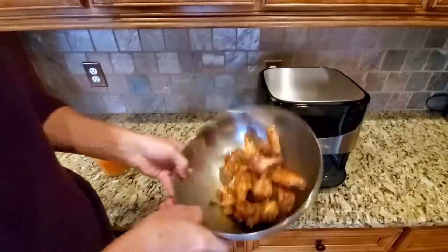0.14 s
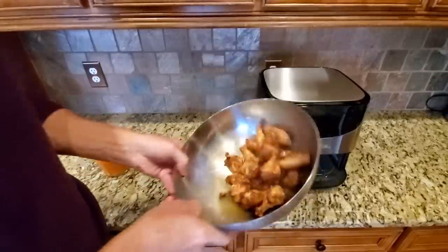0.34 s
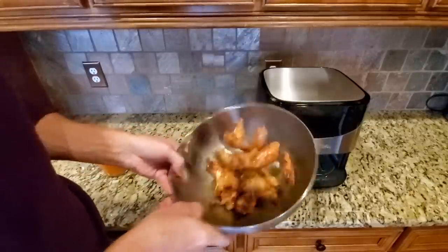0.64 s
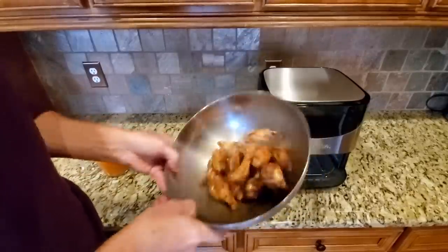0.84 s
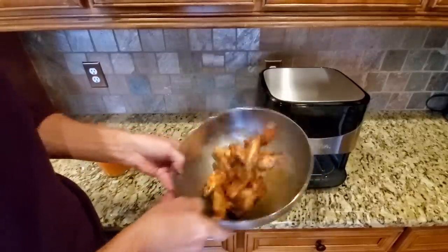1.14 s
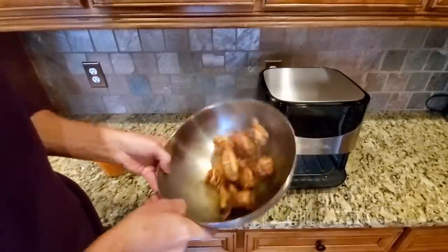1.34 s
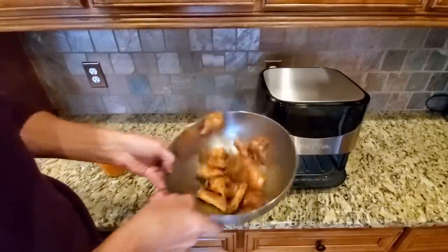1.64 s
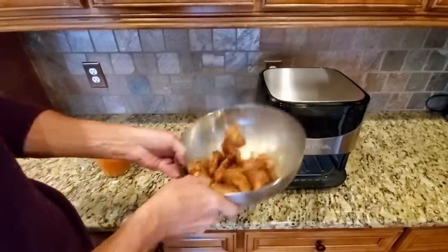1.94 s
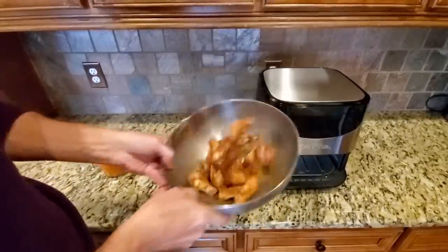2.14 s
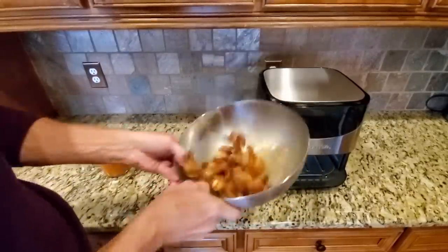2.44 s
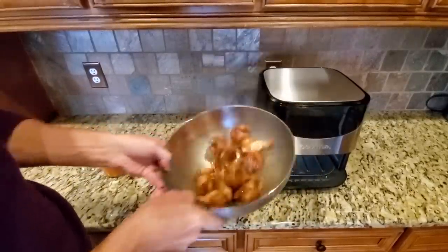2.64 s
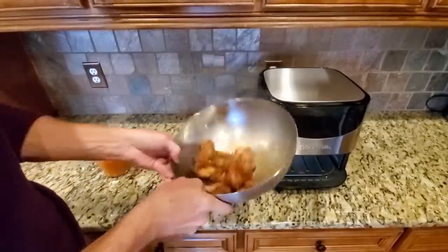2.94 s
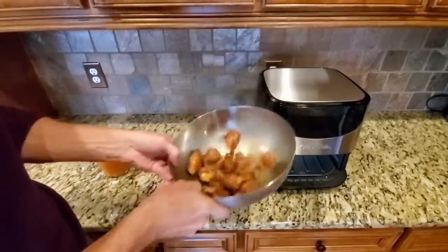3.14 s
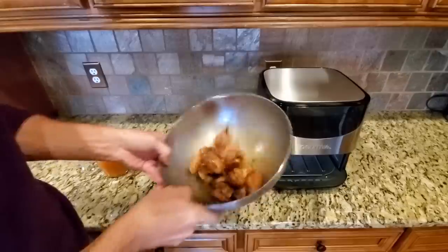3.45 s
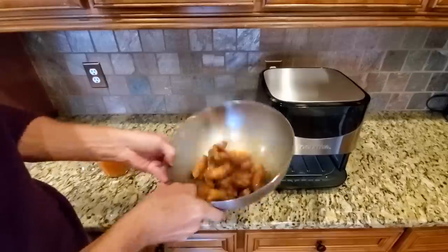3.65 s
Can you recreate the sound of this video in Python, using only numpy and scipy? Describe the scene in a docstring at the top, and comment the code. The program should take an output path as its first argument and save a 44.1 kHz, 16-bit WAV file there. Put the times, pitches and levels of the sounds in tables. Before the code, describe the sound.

Chicken wings are tossed in a steel bowl about four times a second, landing with soft thuds, light clanks and crisp clicks. A few tiny squeaks and one louder clank come through, heard close in a kitchen.

```python
"""Tossing chicken wings in a steel bowl

Coated wings land in a hand-held bowl, about four tosses a second. Each impact excites the damped modes
of the steel, a thud from the bottom and a clank from the wall, while the brittle crust clicks and cracks.
Smaller pieces tumble around them, and now and then a skidding wing squeaks by stick-slip friction.
The tiled kitchen reverberates, and an appliance hums faintly."""
import sys
import numpy as np
from scipy import signal
from scipy.fft import rfft, irfft, next_fast_len
from scipy.io import wavfile

SR = 44100
rng = np.random.default_rng(int(sys.argv[2]) if len(sys.argv) > 2 else 0)


def transcribe(u):
    """Save the signal u as a 16-bit wav file named by the first command-line argument.

    u: samples, shape (n,) or (channels, n), limited to [-1, 1]; the rate is SR.
    q: integer samples, one column per channel.
    """
    v = np.clip(np.atleast_2d(u).T, -1, 1)
    q = np.round(v * 32767).astype(np.int16)
    wavfile.write(sys.argv[1], SR, q)


N = 167580
LEFT_RIGHT = np.array([[.5], [-.5]])  # splits a difference between the ears


def amp(db):
    """Decibels to amplitude ratio."""
    return 10 ** (np.asarray(db) / 20)


def unit(x):
    """Normalisation to rms 1."""
    return x / np.sqrt(np.mean(x ** 2) + 1e-20)


def at_level(x, db, onset_s=.008):
    """Normalisation of an impact by the rms level of its onset."""
    onset = x[..., :round(onset_s * SR)]
    return x * amp(db) / np.sqrt(np.mean(onset ** 2) + 1e-20)


def along(points, hz):
    """Interpolation on a logarithmic frequency axis."""
    freqs, values = np.transpose(points)
    return np.interp(np.log(hz + 1), np.log(freqs + 1), values)


def filtered(x, response):
    """Filtering as multiplication of the spectrum by a frequency response."""
    n = x.shape[-1]
    padded = next_fast_len(n + 4096)
    return irfft(rfft(x, padded) * response(np.fft.rfftfreq(padded, 1 / SR)), padded)[..., :n]


def coloured(x, spectrum):
    """Minimum-phase filtering: the response is causal, so attacks stay sharp."""
    def response(hz):
        cepstrum = np.fft.irfft(np.log(amp(along(spectrum, hz))))
        half = len(cepstrum) // 2
        return np.exp(rfft(np.r_[cepstrum[0], 2 * cepstrum[1:half]], len(cepstrum)))
    return filtered(x, response)


def add(out, start_s, x):
    """Superposition of x on out from a given time."""
    i = max(0, round(start_s * SR))
    n = max(0, min(x.shape[-1], N - i))
    out[:, i:i + n] += x[..., :n]


# Likeness of the two ears' signals. Each row: frequency in Hz, correlation (capped at 1 in use).
COHERENCE = [(100, 1.13), (330, 0.9), (520, 0.8), (900, 0.2), (3000, 0.35)]

def diffuse(pair):
    """Interaural coherence: two independent signals mix into a field that is nearly mono in the bass."""
    def weights(hz):
        angle = np.arccos(np.clip(along(COHERENCE, hz), -1, 1)) / 2
        return np.array([np.cos(angle), np.sin(angle)])
    mid, side = filtered(pair, weights)
    return np.array([mid + side, mid - side])


# Spectrum of the room air. Each row: frequency in Hz, relative density in dB.
AIR_SPECTRUM = [(25, -14), (55, -3), (130, -8), (500, -8), (1000, -18), (3500, -27.5), (6000, -25.5),
                (16000, -36)]
# Harmonics of the hum. Each row: frequency in Hz, level in dB.
HUM_PARTIALS = [(119.6, -52), (239.2, -58)]

def background(air_db=-47.5):
    """Steady ambient noise: broadband room air plus the mains harmonics of an appliance."""
    t = np.arange(N) / SR
    air = unit(coloured(diffuse(rng.standard_normal((2, N))), AIR_SPECTRUM))
    hum = sum(np.sqrt(2) * amp(db) * np.sin(2 * np.pi * (hz * t + rng.random()))
              for hz, db in HUM_PARTIALS)
    return amp(air_db) * air + hum


# Reverberation time. Each row: frequency in Hz, time to fall 60 dB (T60) in seconds.
TAIL_T60 = [(150, 0.09), (1500, 0.46), (6000, 0.31), (14000, 0.13)]
# Strength of the reverberation. Each row: frequency in Hz, relative level in dB.
TAIL_LEVELS = [(100, -8.5), (600, -3.5), (6000, -6.5), (14000, -1)]

def kitchen(x, delay_s=.002, early_db=-3, early_t60_s=0.053):
    """Convolution with a room response: direct sound, early reflections off bowl and counter, a tail."""
    hz, t, noise = signal.stft(rng.standard_normal((2, SR // 2)), SR, nperseg=256)
    def decay(t60):
        fade = amp(-60 * t / t60) * (t > delay_s)
        return fade / np.sqrt(np.mean(fade ** 2, -1, keepdims=True) * SR / 2)
    tail = decay(along(TAIL_T60, hz)[:, None]) * amp(along(TAIL_LEVELS, hz))[:, None]
    early = decay(early_t60_s) * amp(early_db)
    response = diffuse(signal.istft(noise * np.hypot(tail, early), SR, nperseg=256)[1])
    response[:, 0] += 1  # direct sound
    return signal.fftconvolve(x, response, axes=1)


def contacts(per_second, scatter_db=4.5):
    """A Poisson process of tiny impacts of uneven size."""
    hits = rng.random((2, N)) < per_second / SR
    signs = rng.choice([-1, 1], (2, N))
    return hits * signs * amp(scatter_db * np.clip(rng.standard_normal((2, N)), -2, 2))


# Spectra of soft bumps and of rustling crust. Each row: frequency in Hz, relative density in dB.
BUMP_SPECTRUM = [(40, -8.5), (100, 0), (380, -5), (480, 0.5), (700, -5), (1060, -13), (1400, -5.5),
                 (2000, -5), (3000, -11.5), (5000, -27)]
RUSTLE_SPECTRUM = [(1000, -8.5), (3000, -17), (4400, -6.5), (5850, 2.5), (7000, 1), (8500, -14.5),
                   (16000, -18)]
# The heap tumbling. Each row: time of the peak in seconds, relative bump and rustle levels in dB.
TOSS_PEAKS = [(0.082, -32.5, -35.5), (0.314, -30, -35), (0.564, -28.5, -37.5), (0.806, -28, -31.5),
              (1.053, -33.5, -33), (1.298, -32, -34.5), (1.534, -31, -39), (1.781, -31.5, -34.5),
              (2.023, -30.5, -31), (2.298, -30, -33), (2.523, -32, -36.5), (2.777, -28.5, -33.5),
              (3.006, -32.5, -31), (3.238, -27, -33), (3.486, -26.5, -30.5), (3.703, -33.5, -30)]

def tumbling(rise_s=0.036, fall_s=0.031, bump_gain_db=-3, rustle_gain_db=-1.5):
    """Shot noise: many small collisions merge into bumps and rustle that swell and die with each toss."""
    peak_s, bump_db, rustle_db = np.transpose(TOSS_PEAKS)[:, :, None]
    t = np.arange(N) / SR - peak_s
    swell = np.exp(np.where(t < 0, -(t / rise_s) ** 2, -t / fall_s))
    bumps = unit(coloured(diffuse(contacts(per_second=200)), BUMP_SPECTRUM))
    bumps *= (swell * amp(bump_db + bump_gain_db)).sum(0)
    rustle = unit(coloured(contacts(per_second=260), RUSTLE_SPECTRUM))
    rustle *= (swell * amp(rustle_db + rustle_gain_db)).sum(0)
    return kitchen(bumps + rustle)[:, :N]


def attack(t, contact_s=.00028):
    """A finite contact time rounds off the onset of an impact."""
    return 1 - np.exp(-t / contact_s)


def ring(modes, t, detune, scatter_db=1.5):
    """Modal superposition: damped sines, all pushed inward at once, vary with the place of contact."""
    hz, db, t60 = np.transpose(modes)[:, :, None]
    level_draw, pitch_draw = rng.standard_normal((2, len(hz), 1))
    envelopes = amp(db + scatter_db * level_draw - 60 * t / t60)
    waves = envelopes * np.sin(2 * np.pi * hz * (1 + detune * pitch_draw) * t)
    return -waves.sum(0) * attack(t)


# Modes of the free rim. Each row: frequency in Hz, relative level in dB, T60 in seconds.
RIM_MODES = [(475, -26, 0.5), (1058, -25, 0.68), (1140, -29, 0.6), (1533, -30, 0.48), (2030, -26, 0.5)]
BONE_DB = -13  # clank level from which a blow counts as bare bone

def rim(t, clank_db, growth=1.3):
    """Free vibration: the lightly damped rim rings on, more than in proportion after a hard clank."""
    return amp(BONE_DB + growth * (clank_db - BONE_DB)) * ring(RIM_MODES, t, detune=0.00586)


# Skids on the steel. Each row: start in seconds, length in seconds, pitch in Hz, relative level in dB.
SKIDS = [(0.485, 0.018, 1860, -38), (0.832, 0.019, 2000, -24), (0.981, 0.015, 1830, -37),
         (2.701, 0.085, 1840, -38), (2.957, 0.084, 1036, -19), (3.04, 0.06, 590, -33)]

def squeaks(rise=0.035, waver=0.003, roughness=.22, overtone_db=-30, catch_hz=25, sympathy_db=-21):
    """Stick-slip friction gives a rough, rising tone; rim modes near its pitch resonate in sympathy."""
    direct, ringing = np.zeros((2, 2, N))
    t = np.arange(SR // 2) / SR
    for start_s, length_s, hz, db in SKIDS:
        progress = np.linspace(0, 1, round(length_s * SR))
        def wander(count):
            return np.interp(progress, np.linspace(0, 1, count), rng.standard_normal(count))
        slips = round(length_s * hz / 3)  # the grip changes every three cycles
        pitch_hz = hz * (1 + rise * progress + waver * wander(10))
        jitter = roughness * (hz / 1050) ** 2 * wander(slips)  # high squeaks grip less evenly
        phase = 2 * np.pi * np.cumsum(pitch_hz) / SR + jitter
        tone = np.sin(phase) + amp(overtone_db) * np.sin(2 * phase)
        envelope = np.interp(progress, [0, .08, .25, .5, 1], [0, 1, 1, .45, 0])
        grip = 1 + roughness / 2 * wander(slips)
        add(direct, start_s, amp(db) * envelope * grip * tone)
        for rim_hz, _, t60 in RIM_MODES:
            if abs(rim_hz - hz) < catch_hz:
                decay = amp(db + sympathy_db - 60 * t / t60)
                add(ringing, start_s + length_s / 2, decay * np.sin(2 * np.pi * rim_hz * t))
    return (direct + kitchen(direct)[:, :N]) / 2 + ringing


# Spectrum of breaking crust. Each row: frequency in Hz, relative density in dB.
CRUNCH_SPECTRUM = [(1500, -5), (2800, 2), (4200, 0), (9000, 1), (12500, 4.5), (16000, -1.5)]

def crunch(t, cracks_per_s=2000, scatter_db=4.5, t60_s=0.02):
    """Brittle fracture: the coating breaks in a quick cluster of uneven cracks."""
    count = len(t) * cracks_per_s // SR
    sizes = np.interp(t, np.linspace(0, t[-1], count), np.clip(rng.standard_normal(count), -2, 2))
    envelope = amp(scatter_db * sizes - 60 * t / t60_s) * attack(t)
    return coloured(rng.standard_normal((2, len(t))) * envelope, CRUNCH_SPECTRUM)


# High resonances of the scratched steel. Each row: frequency in Hz, relative density in dB.
SCRATCH_SPECTRUM = [(1500, -22), (4400, -15.5), (5300, -10.5), (5850, 1), (7100, 3.5), (8300, -8.5),
                    (11000, -36.5)]

def click(t, hz, ping_s=.00028, ear_phase_rad=2.17, scratch_db=-5, scratch_t60_s=0.015):
    """A hard point contact excites high frequencies: a tip of crust pings the steel, then scratches it."""
    age = t / ping_s
    ear_phases = ear_phase_rad * (1 + rng.standard_normal() / 2) * LEFT_RIGHT
    ping = age ** 2 * np.exp(-age) * np.sin(2 * np.pi * hz * t + ear_phases)
    envelope = amp(-60 * t / scratch_t60_s) * attack(t, contact_s=0.0013)
    scratch = coloured(rng.standard_normal((2, len(t))) * envelope, SCRATCH_SPECTRUM)
    return at_level(ping, 0) + at_level(scratch, scratch_db)


# Modes of the loaded bottom. Each row: frequency in Hz, relative level in dB, T60 in seconds.
BOTTOM_MODES = [(127, -21, 0.035), (257, -31, 0.12), (386, -9, 0.018), (472, 4, 0.036), (590, -9, 0.025)]

def thud(t, dent_db=6, half_width_s=0.00046):
    """Forced, then free motion: the bottom gives once under a soft wing and rings briefly."""
    u = t / half_width_s - np.e
    dent = amp(dent_db) * u * np.exp((1 - u ** 2) / 2) * attack(t)
    return dent + ring(BOTTOM_MODES, t, detune=.06)  # the shifting load bends the pitch


# Modes of the wall. Each row: frequency in Hz, relative level in dB, T60 under flesh in seconds.
WALL_MODES = [(929, -6, 0.012), (1050, 3.5, 0.022), (1140, 0, 0.016), (1545, -4.5, 0.015),
              (2035, -1.5, 0.019), (2700, -2, 0.003)]

def clank(t, db, bone_range_db=14, tilt_db_per_octave=2.5, bone_sustain=1.7):
    """Contact damping: flesh shortens, detunes and tilts the wall's modes; bone rebounds and they ring."""
    flesh = np.clip((BONE_DB - db) / bone_range_db, 0, 1)
    lowest_hz = WALL_MODES[0][0]
    sustain = bone_sustain ** (1 - flesh)
    modes = [(hz, level + flesh * tilt_db_per_octave * np.log2(hz / lowest_hz), t60 * sustain)
             for hz, level, t60 in WALL_MODES]
    return ring(modes, t, detune=0.027 * flesh)


# The wall turning to the left. Each row: time in seconds, the clank's left minus right level in dB.
WALL_PAN = [(3.03, -0.5), (3.24, 2.5)]
# Wings landing. Each row: start in seconds, relative levels of thud, clank, click and crunch in dB,
# pitch of the click in Hz.
LANDINGS = [(0.0221, -31, -40.5, -31, -46, 6000), (0.0773, -27.5, -39, -22.5, -30.5, 5970),
            (0.0897, -32.5, -30.5, -29, -55, 6050), (0.252, -31.5, -39.5, -48, -53, 7000),
            (0.279, -26.5, -31, -28, -32, 5670), (0.284, -27, -27, -31, -53, 5730),
            (0.309, -26.5, -30, -40, -50, 6700), (0.3537, -20.5, -34, -31, -43, 5940),
            (0.3633, -23.5, -36, -30, -43, 5500), (0.3983, -28.5, -33, -27.5, -41, 6860),
            (0.5376, -27, -27, -37, -47, 5750), (0.547, -42, -59, -29, -33, 6640),
            (0.5795, -33.5, -35.5, -38, -50, 6170), (0.644, -31, -39, -34, -49, 6220),
            (0.6859, -32.5, -36.5, -28.5, -35.5, 6030), (0.7844, -27, -26, -19.5, -27.5, 6170),
            (0.8191, -20.5, -38, -22.5, -37, 5740), (0.8348, -36, -27, -32, -45, 6050),
            (0.892, -31, -35, -32, -47.5, 5900), (1.0297, -30.5, -32.5, -31, -42, 5940),
            (1.0438, -25.5, -29, -33, -36, 5840), (1.0603, -26, -43, -25, -29.5, 6040),
            (1.143, -29, -31, -29, -40, 6400), (1.2604, -31.5, -37, -22.5, -34.5, 6320),
            (1.2802, -36, -32, -30.5, -34, 6900), (1.347, -32.5, -42, -42, -48, 5640),
            (1.3954, -28.5, -31, -27, -36, 5730), (1.497, -29, -31, -36.5, -35, 5860),
            (1.5157, -63, -50, -28, -50, 5750), (1.5326, -29.5, -39, -57, -51, 5800),
            (1.555, -52, -48, -35.5, -45, 6000), (1.571, -51, -46, -38, -36, 6040),
            (1.5772, -27.5, -39.5, -39, -50, 5900), (1.7012, -34, -46, -45.5, -59, 5900),
            (1.7441, -24.5, -39, -43, -43, 6450), (1.777, -26, -23.5, -30.5, -51, 7030),
            (1.8344, -30.5, -59, -22, -34, 6000), (1.9425, -30.5, -46, -42, -61, 6140),
            (1.9536, -43, -56, -30, -43.5, 6200), (2.0018, -26.5, -31.5, -28, -45, 6140),
            (2.0433, -24, -30.5, -41, -63, 6260), (2.1047, -41, -61, -33, -43.5, 6200),
            (2.2922, -24, -26, -29.5, -30.5, 6470), (2.3237, -42, -37.5, -26.5, -39.5, 5700),
            (2.469, -47, -42.5, -37, -52, 6100), (2.479, -39, -78, -27.5, -45, 6000),
            (2.4937, -26, -56, -52, -57, 5880), (2.5319, -27.5, -36, -32.5, -34.5, 5500),
            (2.5592, -31, -40, -35.5, -41.5, 5600), (2.5998, -55, -45.5, -26.5, -45.5, 5860),
            (2.7175, -33.5, -42, -27.5, -38, 6070), (2.7554, -22, -36, -32, -40, 7040),
            (2.7807, -26.5, -30, -39, -58, 5700), (2.7973, -29, -28.5, -22.5, -30, 6900),
            (2.8247, -30, -36, -28.5, -44, 5860), (2.9294, -33, -39, -30, -48, 6000),
            (2.9586, -40, -37, -26, -40, 6170), (2.9938, -27.5, -37, -34, -37, 6270),
            (3.0193, -25.5, -32, -26.5, -35.5, 6960), (3.033, -21, -30.5, -20.5, -33.5, 5810),
            (3.187, -35, -39, -39, -68, 5790), (3.1998, -38, -45, -30.5, -36, 7000),
            (3.208, -48, -26.5, -34, -50, 5430), (3.2331, -25.5, -25.5, -27.5, -42, 6900),
            (3.407, -36.5, -44, -37.5, -46.5, 5750), (3.455, -31, -11.5, -30.5, -41, 5760),
            (3.4727, -20, -22, -31, -53, 5630), (3.4925, -52, -35, -30.5, -55, 5850),
            (3.566, -35, -29, -24.5, -34.5, 6860), (3.677, -24, -32.5, -24.5, -33.5, 5750),
            (3.6886, -31, -38, -23.5, -47, 6070), (3.7018, -26, -23.5, -34, -44, 5600),
            (3.7144, -39, -44, -22.5, -32.5, 5820), (3.7604, -26, -34.5, -26.5, -37, 5800)]

def landing_wings(thud_gain_db=-2, clank_gain_db=-2.5, click_gain_db=1.5, crunch_gain_db=2):
    """Impact excitation: each wing drives bottom, wall, rim and its own crust at the same instant."""
    out = np.zeros((2, N))
    t, rim_t = np.arange(SR // 10) / SR, np.arange(SR // 2) / SR
    for start_s, thud_db, clank_db, click_db, crunch_db, click_hz in LANDINGS:
        pan = amp(np.interp(start_s, *np.transpose(WALL_PAN)) * LEFT_RIGHT)
        bottom = at_level(thud(t), thud_db + thud_gain_db)
        wall = pan * at_level(clank(t, clank_db), clank_db + clank_gain_db)
        tip = at_level(click(t, click_hz), click_db + click_gain_db)
        cracks = at_level(crunch(t), crunch_db + crunch_gain_db)
        add(out, start_s, kitchen(bottom + wall + tip + cracks))
        add(out, start_s, rim(rim_t, clank_db))
    return out


# Interaural level difference. Each row: frequency in Hz, left minus right level in dB.
EAR_BALANCE = [(380, 2), (700, 0), (1100, 0), (2200, 1), (4400, -1.5), (15000, -3)]

def scene():
    """Superposition of all sources: the bowl is just ahead, bass leaning left and treble right."""
    sound = landing_wings() + tumbling() + squeaks() + background()
    return filtered(sound, lambda hz: amp(along(EAR_BALANCE, hz) * LEFT_RIGHT))


def record(dry):
    """Band limiting: an ideal low-pass filter removes everything above 16.1 kHz."""
    return filtered(dry, lambda hz: hz < 16100)


dry = scene()
out = record(dry)
transcribe(out)
```